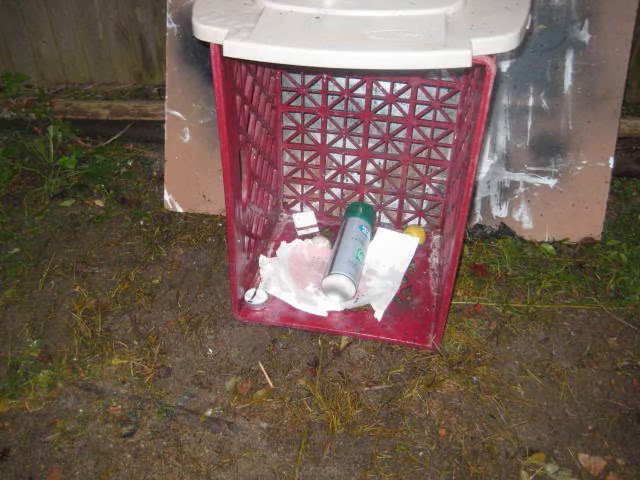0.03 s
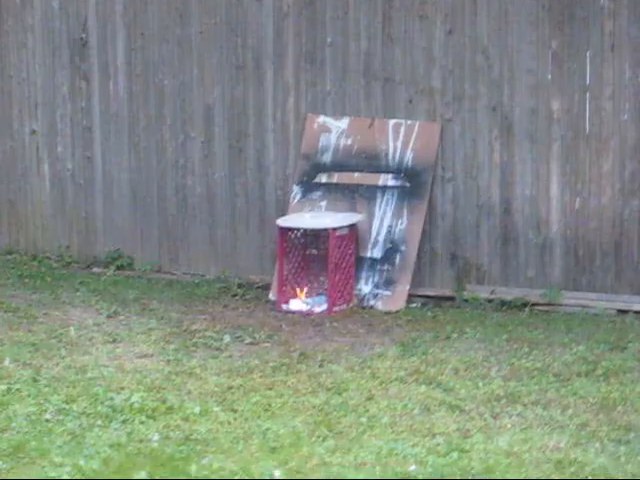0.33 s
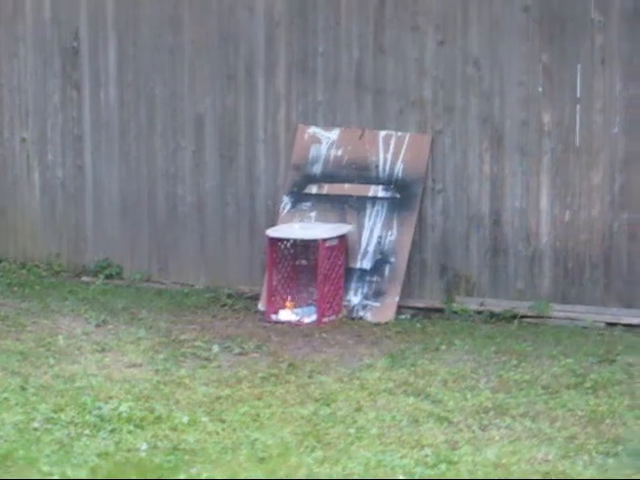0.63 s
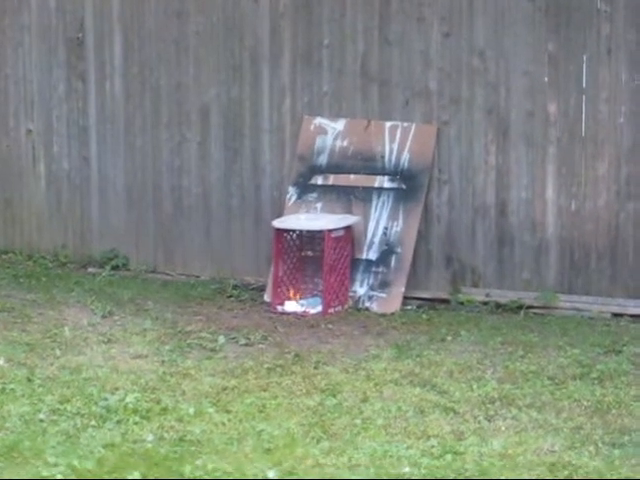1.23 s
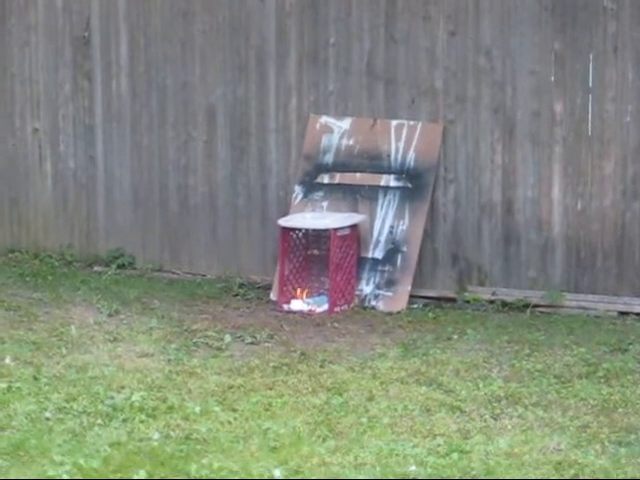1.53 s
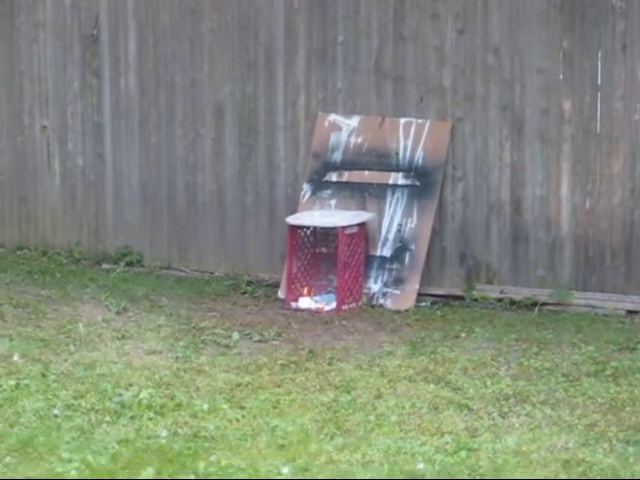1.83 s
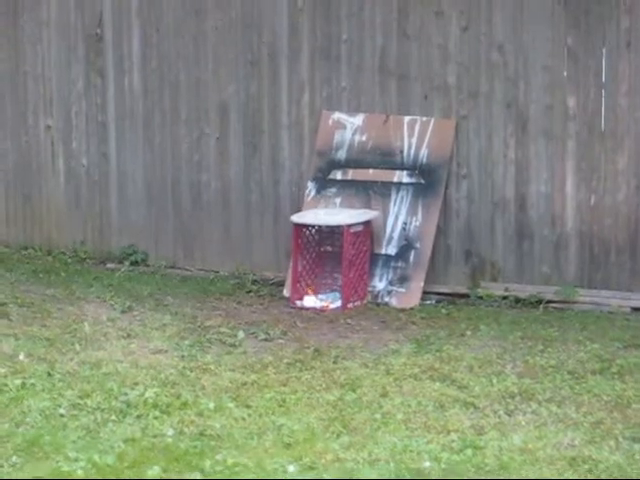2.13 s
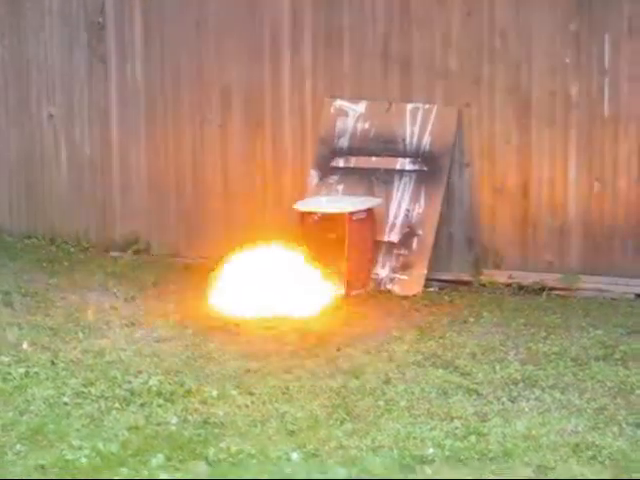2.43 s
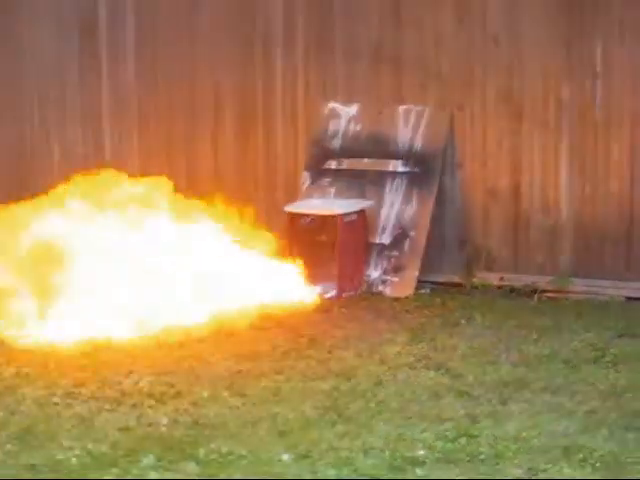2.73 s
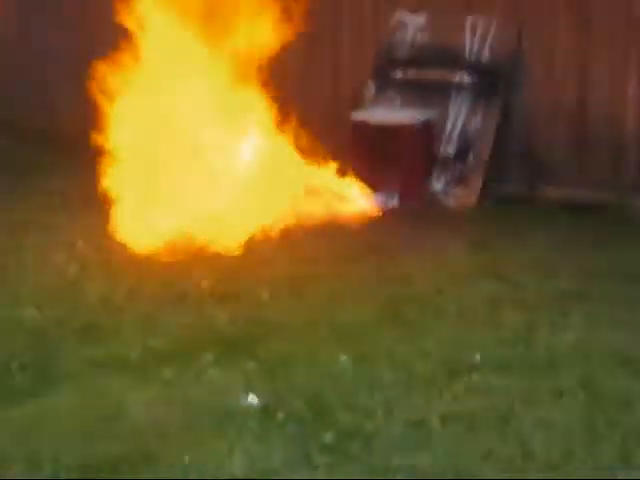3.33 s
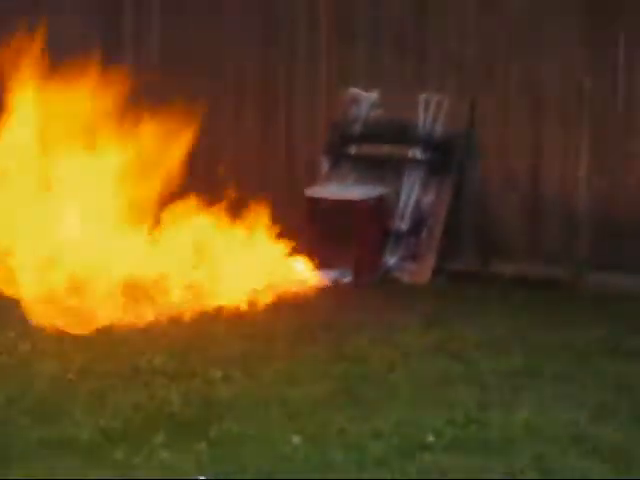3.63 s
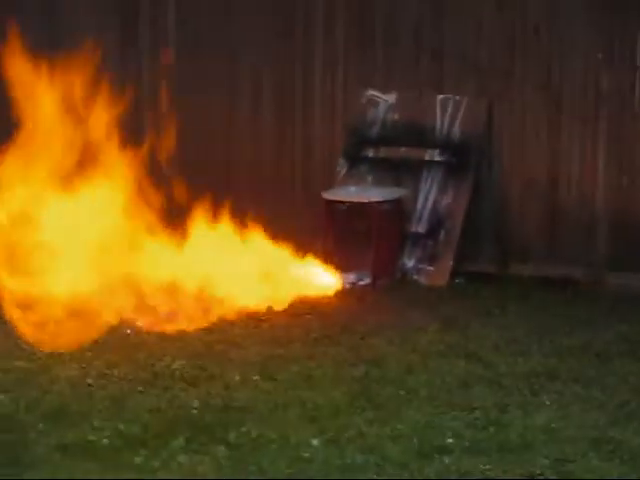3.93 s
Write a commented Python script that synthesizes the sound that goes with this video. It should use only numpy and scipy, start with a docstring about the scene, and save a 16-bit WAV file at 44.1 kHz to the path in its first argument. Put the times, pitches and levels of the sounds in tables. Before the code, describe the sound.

An aerosol can bursts with a sharp crack into a hissing, roaring jet of flame.

```python
"""First come a small camera's hiss and whine in a back yard, a few handling clicks and a far bird.
Then an aerosol can, heated over a small fire, splits with sharp ringing cracks and a short squeal.
Its gas hisses out as a turbulent jet, catches fire a tenth of a second after the first crack
and roars as a long, puffing flame in front of a wooden fence."""
import sys
import numpy as np
from scipy import signal
from scipy.fft import rfft, irfft, next_fast_len
from scipy.io import wavfile
from scipy.ndimage import uniform_filter1d, map_coordinates

SR = 44100
rng = np.random.default_rng(int(sys.argv[2]) if len(sys.argv) > 2 else 0)


def unload_audio(sound):
    """Save the sound as a 16-bit wav file, at the path given as the first command line argument."""
    columns = np.transpose(np.atleast_2d(sound))
    # keep every value between -1 and 1, then stretch to whole-number steps
    steps = np.round(np.clip(columns, -1, 1) * 32767)
    wavfile.write(sys.argv[1], SR, steps.astype(np.int16))


N = 176400


# Each row: start in seconds, level in dB, hold in seconds, grit gain in dB.
CRACKS = [(2.4092, 0, 0.0028, -9.5), (2.4201, -6.5, 0.00056, -9), (2.431, -12, 0.00044, -7),
          (2.4518, -5, 0.00063, 2.5), (2.4611, -9.5, .00037, -3), (2.4638, -16, 0.00064, 0)]
# Each row: mode frequency in Hz, relative level in dB.
CAN_MODES = [(1000, -9.5), (2210, -7.5), (3430, -4), (4670, -4), (5900, -8), (7080, -8.5), (8280, -11)]
# Each row: frequency in Hz, relative density in dB.
GRIT_SPECTRUM = [(60, -26), (400, -24), (1200, 0.5), (1750, -12), (2400, 0), (3450, 6), (4150, -13),
                 (5400, 2.5), (8500, -8), (11500, -8), (15000, -36)]
def can_cracks(t60_s=0.0025):
    """Impulse excitation: each tear sets the can's damped modes ringing, with a burst of noise."""
    grit = coloured(rng.standard_normal(N), GRIT_SPECTRUM)
    out = np.zeros(N)
    age = np.arange(SR // 20) / SR
    for start, db, hold, grit_db in CRACKS:
        span = slice(round(start * SR), round(start * SR) + len(age))
        ring = sum(amp(level) * np.sin(2 * np.pi * (hz * age + rng.random())) for hz, level in CAN_MODES)
        envelope = amp(db - 60 * np.maximum(age - hold, 0) / t60_s)
        out[span] += envelope * (ring + amp(grit_db) * grit[span])
    return out


def blast(peak_db=6.5, width_s=0.00029):
    """Blast wave: the first crack releases a pressure step that decays into a weak rarefaction."""
    u = np.maximum(clock() - CRACKS[0][0], 0) / width_s
    return amp(peak_db) * (u > 0) * (1 - 0.42 * u) * np.exp(-u)


# Each row: time in seconds, level in dB.
SPURT_LEVELS = [(2.402, -40), (2.4055, -16), (2.414, -16.5), (2.43, -17), (2.448, -19), (2.466, -15.5),
                (2.476, -27), (2.52, -45)]
# Each row: frequency in Hz, relative density in dB.
SPURT_SPECTRUM = [(60, -45), (750, -24), (1130, -6.5), (2700, -3.5), (3500, 0), (4150, 0), (5400, 4),
                  (8200, 1.5), (10500, -5), (13000, -20), (15500, -28)]
# Each row: time in seconds, pitch in Hz, level in dB.
SQUEAL = [(2.4535, 10470, -22), (2.4555, 8400, -15), (2.4578, 6020, -20), (2.461, 5240, -11),
          (2.465, 5000, -30)]
def slit_flow():
    """Orifice flow: the first gas through the slit makes broadband noise and a falling whistle."""
    envelope = during(SPURT_LEVELS) * amp(curves(SPURT_LEVELS)[0])
    return envelope * coloured(rng.standard_normal(N), SPURT_SPECTRUM) + glide(SQUEAL, rough=.03)


# Each row: time in seconds, rush level in dB, fizz level in dB.
JET_LEVELS = [(2.48, -32, -26.5), (2.53, -27, -23), (2.61, -20.5, -20.5), (2.7, -23.5, -20.5),
              (2.85, -22, -22), (2.95, -27.5, -21.5), (3.006, -23.5, -21.5), (3.05, -25.5, -21.5),
              (3.12, -22.5, -21), (3.5, -24, -21.5), (3.7, -25, -22), (3.768, -21.5, -23), (3.8, -26, -22),
              (3.85, -23, -21.5), (4, -25.5, -22)]
# Each row: time in seconds, gain of the fizz's top band in dB.
TREBLE_GAINS = [(2.48, 7), (2.55, -2.5), (2.65, -5), (2.8, -1), (2.92, 3), (3.1, -1), (3.7, 0.5), (4, 0.5)]
# Each row of both: frequency in Hz, relative density in dB.
RUSH_SPECTRUM = [(1100, -27), (1900, -10), (2170, -5), (2400, -8.5), (2730, 0), (2820, -4), (3110, 0.5),
                 (3200, -5), (3440, 1.5), (3570, -4), (3770, 2.5), (3900, -4), (4030, 2.5), (4200, -5),
                 (4650, -6), (5000, -7.5), (6500, -36), (11000, -100)]
FIZZ_SPECTRUM = [(2940, -26.5), (5000, -5), (5470, 0.5), (6330, -3.5), (7510, -0.5), (9120, -2.5),
                 (10800, -6), (12800, -20), (15500, -32.5)]
def gas_jet(start_s=2.468, treble_hz=9400):
    """Jet noise: turbulent gas radiates a steady, slightly fluttering hiss, combed by nearby surfaces."""
    rush_db, fizz_db = curves(JET_LEVELS)
    flutter_db = 0.46 * wobble(45)
    rush = amp(rush_db + flutter_db) * scattered(coloured(turbulence(patchy_db=1.0), RUSH_SPECTRUM))
    fizz_gain = amp(fizz_db + flutter_db + 0.36 * wobble(160))
    fizz = fizz_gain * scattered(coloured(turbulence(patchy_db=1.0), FIZZ_SPECTRUM))
    top_band = filtered(fizz, lambda hz: 1 / (1 + (treble_hz / (hz + 1)) ** 20))
    top_gain = amp(curves(TREBLE_GAINS)[0])
    return ramp(start_s, .01) * (rush + fizz + (top_gain - 1) * top_band)


# Each row: time in seconds, rumble level in dB, roar level in dB.
FLAME_LEVELS = [(2.5, -25.5, -33.5), (2.6, -25, -35), (2.635, -33, -37.5), (2.7, -26, -32.5),
                (2.85, -26, -31.5), (2.95, -27, -32), (3.27, -23, -28.5), (3.44, -26, -31.5),
                (3.62, -23.5, -28), (3.76, -24.5, -30.5), (3.787, -20.5, -28.5), (3.83, -24, -26.5),
                (4, -20.5, -27.5)]
# Each row of both: frequency in Hz, relative density in dB.
RUMBLE_SPECTRUM = [(20, -33), (42, -11), (56, -12), (72, -0.5), (92, -3), (113, -7), (138, -5.5),
                   (158, 1.5), (190, -2.5), (232, -11), (285, -6), (320, -9.5), (348, -6), (385, -18.5),
                   (420, -22), (800, -88)]
ROAR_SPECTRUM = [(240, -24), (400, -7.5), (441, 0.5), (510, -7), (570, -6), (680, -8.5), (740, -5.5),
                 (915, -6.5), (996, -11.5), (1200, -8.5), (1470, -15), (1600, -11), (1900, -17),
                 (2470, -33), (4180, -120)]
# Each row: centre in seconds, peak in dB, width in seconds.
BIG_PUFFS = [(2.505, -13, 0.0022), (3.118, -22.5, 0.0015), (3.653, -16, 0.002), (3.784, -10.5, 0.0013),
             (3.866, -14, .001), (3.931, -11, 0.0019)]
# One row: level in dB, pitch in Hz, 60 dB decay time in seconds.
IGNITION_BOOM = (-27.5, 120, 0.76)
def flame(ignition_s=2.496):
    """Combustion noise: the cloud lights with a boom, then pockets of gas burn in a dense run of puffs."""
    rumble_db, roar_db = curves(FLAME_LEVELS)
    rumble = coloured(0.71 * turbulence(patchy_db=1.5) - pops(per_s=500, spread_db=1.2), RUMBLE_SPECTRUM)
    burning = turbulence(patchy_db=1.15) - 0.54 * pops(per_s=400, spread_db=4.5)
    roar = scattered(coloured(burning, ROAR_SPECTRUM))
    age = np.maximum(clock() - ignition_s, 0)
    boom_db, boom_hz, boom_t60 = IGNITION_BOOM
    boom_phase = 2 * np.pi * boom_hz * age + .5 * wobble(40)
    boom = amp(boom_db - 60 * age / boom_t60) * np.sqrt(2) * np.sin(boom_phase)
    out = boom + amp(rumble_db) * rumble + amp(roar_db + 0.65 * wobble(40)) * roar
    out *= ramp(ignition_s, 0.012)
    for centre, db, width in BIG_PUFFS:
        u = (clock() - centre) / width
        out += amp(db) * (u * u - 1) * np.exp(-u * u / 2)
    return out


def fence_echo(x, delay_s=.00644, share=0.11):
    """Interference: one delayed reflection off the fence adds to the direct sound."""
    return filtered(x, lambda hz: 1 + share * np.exp(-2j * np.pi * hz * delay_s))


def scattered(x, level_db=-13, t60_s=0.078):
    """Comb filtering: close reflections from basket, board and ground ripple the spectrum; rms 1."""
    t = np.arange(SR // 25) / SR
    echoes = rng.standard_normal(len(t)) * amp(-60 * t / t60_s) * (np.arange(len(t)) > SR // 400)
    return unit(x + amp(level_db) * signal.fftconvolve(x, echoes / np.linalg.norm(echoes))[:N])


# Each row: frequency in Hz, 60 dB decay time in seconds.
YARD_DECAY = [(100, .15), (2000, .16), (12000, .08)]
def yard_reverb(x, level_db=-25):
    """Reverberation: reflections from fences and house die away exponentially, the treble soonest."""
    hz, t, bands = signal.stft(rng.standard_normal(SR // 3), SR, nperseg=256)
    decay = amp(-60 * t / along(YARD_DECAY, hz)[:, None])
    tail = signal.istft(bands * decay, SR, nperseg=256)[1]
    return amp(level_db) * signal.fftconvolve(x, tail / np.linalg.norm(tail))[:N]


# Each row: start in seconds, level in dB, ring in Hz, its 60 dB decay time in seconds, tick gain in dB.
CASE_CLICKS = [(.544, -38, 3800, 0.023, 4.5), (.666, -29.5, 616, .022, -8),
               (0.7254, -26, 1300, 0.015, -0.5), (0.735, -21, 972, 0.031, -11),
               (1.006, -36, 6500, .008, -2)]
# Each row: frequency in Hz, relative density in dB.
TICK_SPECTRUM = [(100, -7), (500, 3), (1750, -1), (2050, -6), (2500, 3), (3300, -6.5), (4200, -5),
                 (5200, -14), (7300, -6), (15000, -23)]
def handling_clicks(tick_t60_s=0.032):
    """Damped resonance: each touch gives a noisy tick and rings one mode of the camera's plastic case."""
    out = np.zeros(N)
    grit = coloured(rng.standard_normal(N), TICK_SPECTRUM)
    for start, db, hz, t60, tick_db in CASE_CLICKS:
        age = np.maximum(clock() - start, 0)
        ring = np.sin(2 * np.pi * hz * age) * amp(-60 * age / t60)
        tick = amp(tick_db - 60 * age / tick_t60_s) * grit
        out += amp(db) * (age > 0) * (ring + tick)
    return out


# Each row: time in seconds, pitch in Hz, level in dB.
BIRD_CHIRP = [(1.758, 5600, -70), (1.765, 6400, -44), (1.775, 7440, -44), (1.8, 7000, -56)]
def far_bird():
    """Frequency sweep: one faint whistle rises quickly and sags."""
    return glide(BIRD_CHIRP, rough=0.033)


# Each row: frequency in Hz, rms level in dB.
HUM_TONES = [(120, -56), (294, -62), (404, -58.5), (2660, -62), (2717, -62), (4440, -61.5)]
# Each row: carrier in Hz, rms level in dB, rms phase swing in radians.
WHINE_TONES = [(7565, -47.5, .52), (7900, -55, .4), (7950, -58.5, .6), (15120, -62.5, .9)]
def camera_whine(frame_hz=30):
    """Phase modulation: high electrical tones buzz at the frame rate above a steady hum."""
    t = clock()
    hum = sum(amp(db) * np.sin(2 * np.pi * hz * t + 0.39 * wobble(2.9)) for hz, db in HUM_TONES)
    buzz = unit(sum(np.cos(2 * np.pi * (k * frame_hz * t + rng.random())) / k for k in range(1, 7)))
    whine = sum(amp(db) * np.sin(2 * np.pi * hz * t + swing * buzz + .1 * wobble(20))
                for hz, db, swing in WHINE_TONES)
    return np.sqrt(2) * (hum + whine)


# Each row: frequency in Hz, relative density in dB.
AIR_SPECTRUM = [(20, -23), (55, -1.5), (110, -3), (160, -6), (300, -7.5), (550, -7), (850, -4), (1700, -9),
                (3200, -12), (5000, -13.5), (5800, -7.5), (6500, -14.5), (7200, -15.5), (8250, -10),
                (8800, -15.5), (9500, -18.5), (10200, -11.5), (11200, -14), (12000, -13), (13800, -22.5),
                (15500, -29)]
def air_and_hiss(level_db=-40.5):
    """Noise floor: yard air and microphone hiss form a nearly steady broadband bed."""
    return amp(level_db + 0.44 * wobble(6.16)) * coloured(turbulence(patchy_db=0.65), AIR_SPECTRUM)


def amp(db):
    """Decibels to gain."""
    return 10 ** (np.asarray(db) / 20)


def unit(x):
    """Normalisation to rms 1."""
    return x / np.sqrt(np.mean(x ** 2) + 1e-20)


def clock():
    """Sample times in seconds."""
    return np.arange(N) / SR


def along(points, hz):
    """Interpolation of (Hz, value) points on a log frequency axis."""
    knots_hz, values = np.transpose(points)
    return np.interp(np.log(hz + 1), np.log(knots_hz + 1), values)


def curves(rows):
    """Linear interpolation over time of each column after the first."""
    times, *columns = np.transpose(rows)
    return [np.interp(clock(), times, column) for column in columns]


def ramp(start_s, rise_s):
    """Linear onset from silence to full level."""
    return np.clip((clock() - start_s) / rise_s, 0, 1)


def during(rows):
    """Rectangular window from the first row's time to the last."""
    return (clock() >= rows[0][0]) & (clock() <= rows[-1][0])


def wobble(rate):
    """A smooth random curve, rate knots a second."""
    return map_coordinates(rng.standard_normal(int(N * rate / SR) + 4), [clock() * rate])


def filtered(x, response):
    """Linear filtering: the spectrum of x times a frequency response."""
    size = next_fast_len(N + SR // 2)
    return irfft(rfft(x, size) * response(np.fft.rfftfreq(size, 1 / SR)), size)[:N]


def coloured(x, spectrum):
    """Spectral shaping of x, at rms 1."""
    return unit(filtered(x, lambda hz: amp(along(spectrum, hz))))


def turbulence(patchy_db):
    """Random modulation: white noise whose gain varies in patches of time and frequency."""
    bands = signal.stft(rng.standard_normal(N), nperseg=512)[2]
    patches = uniform_filter1d(rng.standard_normal(bands.shape), size=4, axis=0)
    patches = uniform_filter1d(patches, size=12, axis=1)
    return signal.istft(bands * amp(patchy_db * unit(patches)), nperseg=512)[1][:N]


def pops(per_s, spread_db):
    """Shot noise: random one-sided impulses of uneven size."""
    hits = rng.random(N) < per_s / SR
    return unit(hits * amp(spread_db * np.clip(rng.standard_normal(N), -2, 2)))


def glide(rows, rough):
    """Frequency modulation: a whistle along (s, Hz, dB) rows, with relative pitch jitter rough."""
    hz, db = curves(rows)
    phase = 2 * np.pi * np.cumsum(hz * (1 + rough * wobble(1500))) / SR
    return during(rows) * amp(db) * np.sqrt(2) * np.sin(phase)


def scene():
    """Superposition: all sources add at one microphone."""
    burst = can_cracks() + slit_flow() + blast()
    background = air_and_hiss() + camera_whine() + handling_clicks() + far_bird()
    mono = background + burst + yard_reverb(burst) + gas_jet() + fence_echo(flame())
    return np.array([mono, mono])


def record(dry):
    """Saturation and band limiting: the camera starts, overloads on the cracks and cuts the top treble."""
    start_s, top_hz = 0.3664, 15700
    clipped = np.clip(dry * ramp(start_s, 0.00093), -1, 1)
    return np.array([filtered(x, lambda hz: np.clip((top_hz - hz) / 200 + .5, 0, 1)) for x in clipped])


dry = scene()
out = record(dry)
unload_audio(out)
```